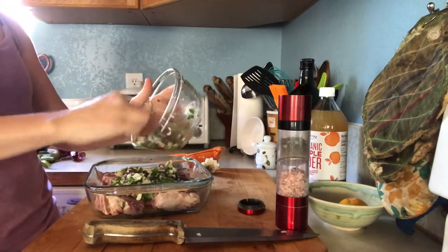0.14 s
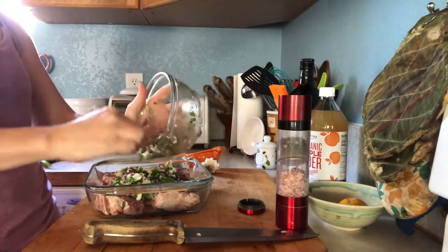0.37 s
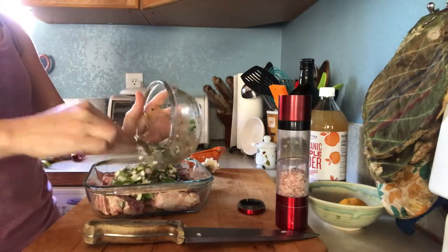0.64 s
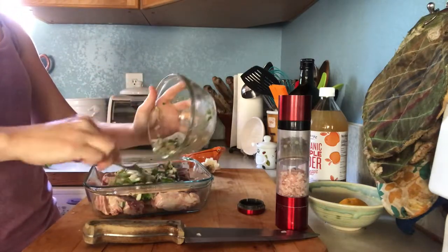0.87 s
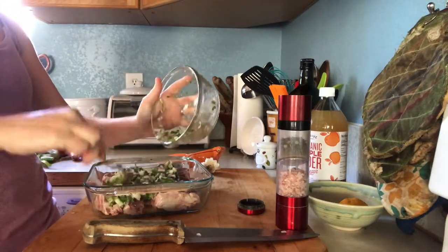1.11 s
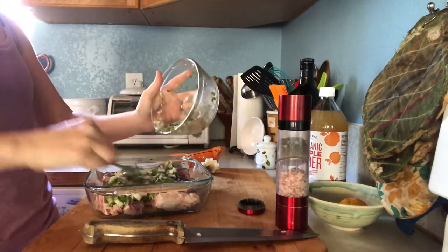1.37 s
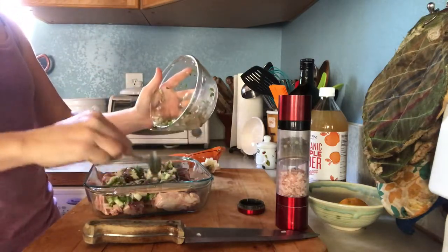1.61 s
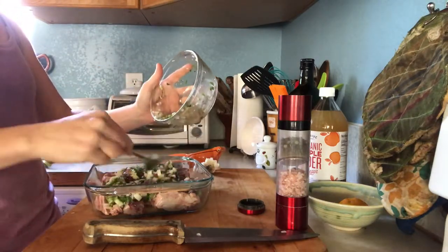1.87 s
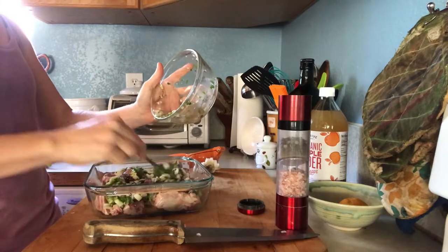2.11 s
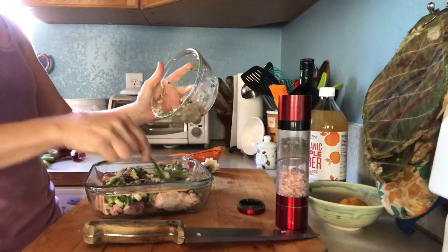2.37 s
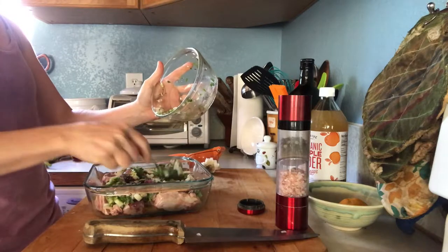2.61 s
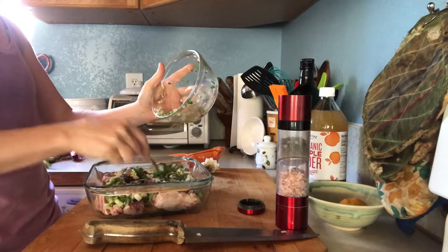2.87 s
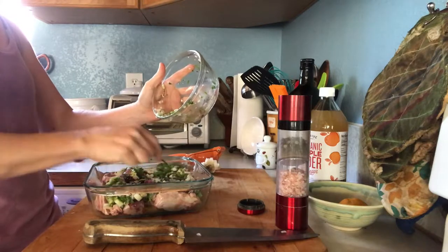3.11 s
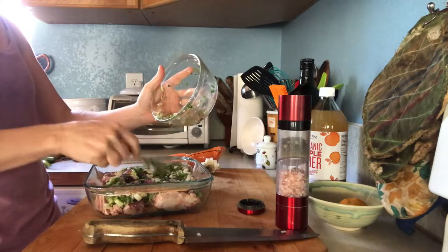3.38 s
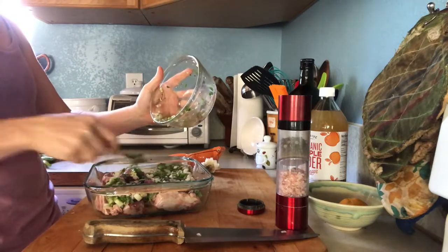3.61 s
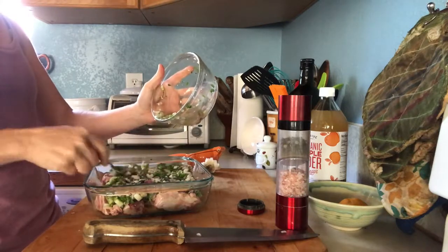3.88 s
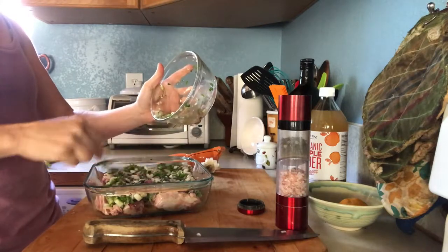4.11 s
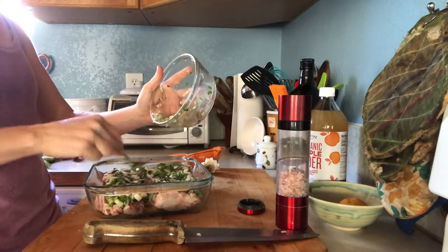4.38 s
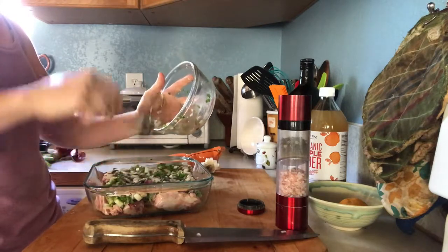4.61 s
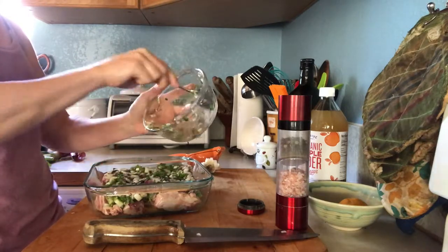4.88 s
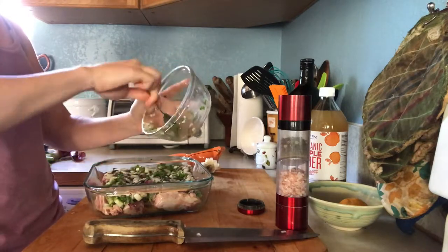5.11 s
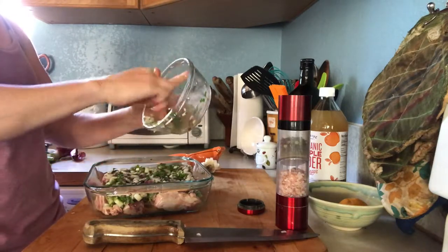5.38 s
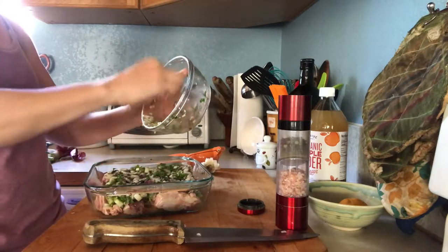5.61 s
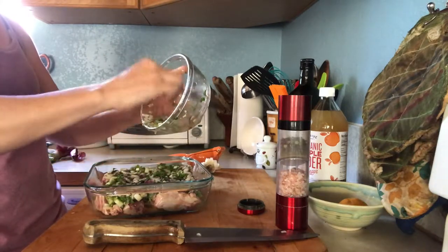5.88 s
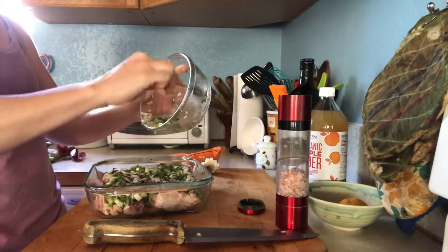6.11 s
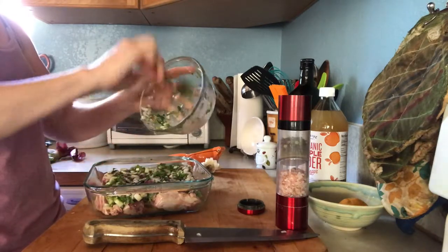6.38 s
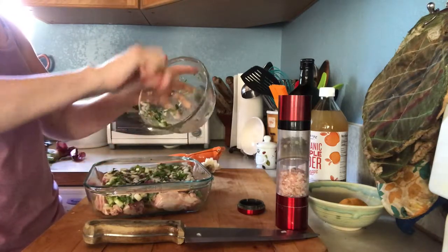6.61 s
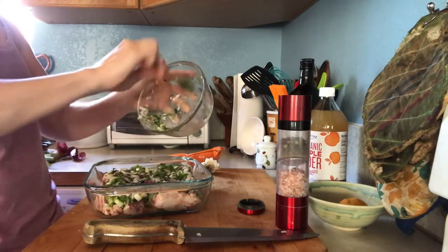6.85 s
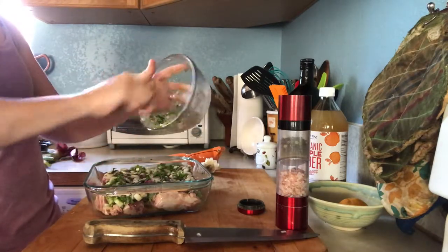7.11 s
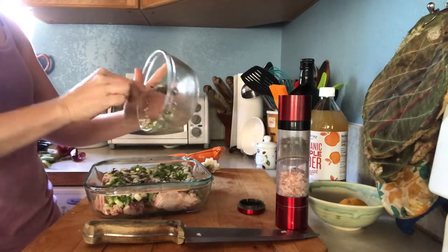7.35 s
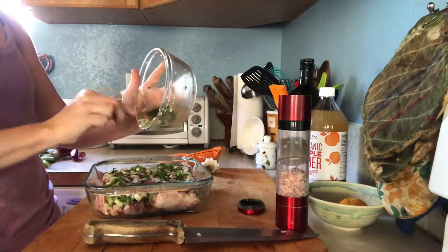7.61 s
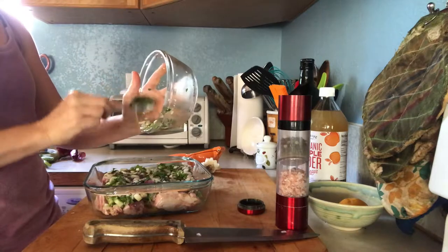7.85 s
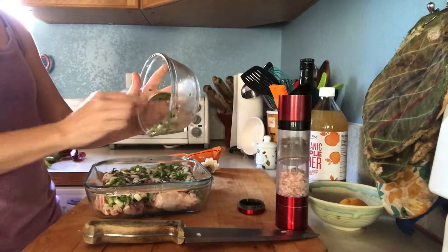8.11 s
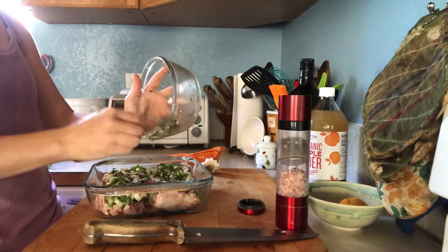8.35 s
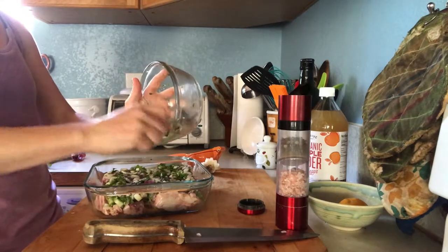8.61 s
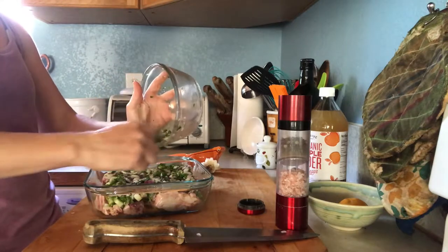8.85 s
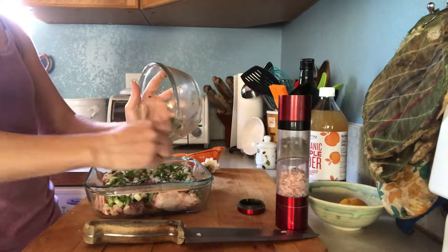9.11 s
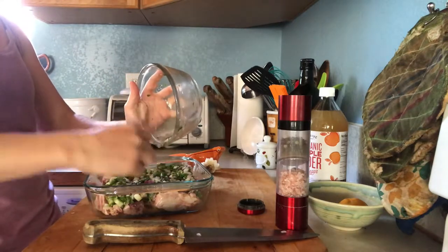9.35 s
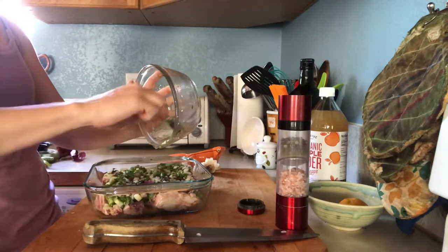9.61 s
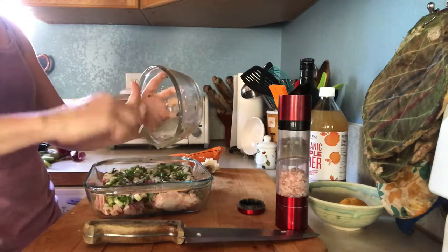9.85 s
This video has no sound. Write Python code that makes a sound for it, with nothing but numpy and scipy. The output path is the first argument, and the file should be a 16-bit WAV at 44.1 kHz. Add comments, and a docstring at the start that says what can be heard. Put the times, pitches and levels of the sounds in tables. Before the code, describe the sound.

Close-up kitchen sound with a low steady appliance hum. Sharp, hard spoon-on-glass clinks come first, choked at once by the holding hand. For several seconds only tiny wet pops and soft rustling strokes are heard, until a lower knock on a baking dish. After that, scattered loud and light taps, skids and short scrapes on the bowl, growing firmer and more regular at the end, where the glass squeaks once.

```python
"""A steel spoon taps and scrapes a small hand-held glass bowl, once knocks the baking dish below, and
spreads chopped herbs with faint wet crackles. Knocks are short decaying modes under a noisy crack, for the
hand damps the glass at once; scrapes are jerky noise through resonances, with one stick-slip squeal.
The kitchen carries the ring on as a noise echo; a fridge and a fan hum as wavering tones over air noise."""
import sys
import numpy as np
from scipy import signal
from scipy.fft import rfft, irfft
from scipy.io import wavfile
from scipy.ndimage import uniform_filter1d

SR = 44100
rng = np.random.default_rng(int(sys.argv[2]) if len(sys.argv) > 2 else 0)


def magnitude_from_level(level_db):
    """Linear magnitude for a level in decibels (20 dB per decade)."""
    exponent = np.asarray(level_db, float) / 20
    return 10 ** exponent


def to_wav(s):
    """Save 16-bit WAV."""
    ch = np.atleast_2d(s).T  # columns
    pcm = np.round(np.clip(ch, -1, 1) * 32767)  # PCM
    wavfile.write(sys.argv[1], SR, pcm.astype(np.int16))


N = 440118
DECAY = np.log(1000)  # exponent of a 60 dB fade

# spoon on bowl: (time [s], crack level [dB], low rim ring [dB], high rim ring [dB], base ring [dB])
TAPS = [(0.0787, -14, -32.5, -44, -34.5), (0.1027, -10.5, -85, -20, -29),
        (0.4071, -12.5, -24, -56.5, -45.5), (0.4352, -7, -29, -38.5, -37.5),
        (4.9192, -10.5, -26.5, -33, -56), (4.9904, -38, -46, -70, -74), (5.1354, -33.5, -38, -57.5, -73.5),
        (5.3606, -12.5, -81, -21, -20), (5.4535, -28.5, -44.5, -59, -47), (5.4973, -45, -45, -60, -64),
        (5.6735, -13, -81, -15.5, -18), (5.7563, -22.5, -61, -58, -51), (5.7898, -70, -70, -49, -53),
        (5.955, -14, -80, -25, -20.5), (6.2078, -12, -27.5, -60, -65), (6.2317, -22.5, -62, -37, -36),
        (6.2756, -24.5, -41, -72, -55), (6.3135, -28, -46, -46, -70), (6.541, -17.5, -32.5, -31, -33.5),
        (6.8187, -39.5, -47, -40, -85), (6.9813, -17, -32, -23.5, -49), (7.1174, -33, -62, -53.5, -54),
        (7.212, -40, -66, -49, -59), (7.4847, -21, -53.5, -28, -16.5), (7.5952, -29, -48, -52, -50),
        (7.8352, -14, -42, -20.5, -26.5), (8.268, -15, -78, -31.5, -12), (8.6298, -26.5, -29.5, -28.5, -38),
        (8.648, -14, -55, -28, -25), (8.6937, -17, -30, -68, -31), (8.973, -12.5, -32.5, -13, -68),
        (9.226, -11, -28, -25.5, -28), (9.3937, -17.5, -38, -12.5, -50), (9.6665, -10.5, -27.5, -15, -65),
        (9.817, -14, -56, -8.5, -49)]
# modes of the bending rim, the thick base and the spoon: (level [dB], t60 before damping limits [s])
RIM = [(-7, 0.074), (0, 0.05), (2.5, 0.079), (-12.5, 0.11), (4.5, 0.029), (-8.5, 0.043), (-3.5, 0.011),
       (-21.5, 0.025), (-10, 0.027), (-6.5, 0.047)]
BASE = [(-27, 0.012), (-7, 0.012), (-18.5, 0.054), (-23, 0.09), (-0.5, 0.026), (-6.5, 0.017), (-2.5, 0.02),
        (-13.5, 0.03), (-20, 0.03), (-13.5, .02)]
SPOON = [(-20.5, 0.021), (-17.5, .03), (-17.5, .03), (-7, .02), (-10.5, 0.018)]
# centre pitches of the same modes: (frequency [Hz])
RIM_HZ = [950, 2120, 2180, 3730, 3790, 5790, 5853, 8260, 11080, 14200]
BASE_HZ = [400, 800, 1800, 2660, 4660, 4715, 7620, 10150, 12120, 14720]
SPOON_HZ = [5190, 6450, 9520, 12550, 13550]


def unit(x):
    """Scale to rms 1."""
    return x / np.sqrt(np.mean(x ** 2))


def band(x, hz, width):
    """Two-pole resonance, gain 1 at the centre."""
    return signal.lfilter(*signal.iirpeak(min(hz, 0.4 * SR), hz / width, SR), x)


def twice(x, hz, width):
    """A steeper resonance: two equal ones in series."""
    return band(band(x, hz, width), hz, width)


def add(out, s, x):
    """Mix x in at time s."""
    i = int(s * SR)
    out[i:i + len(x)] += x[:N - i]


def walk(rate):
    """Random levels held 1 / rate seconds and slewed twice."""
    k = int(SR / rate)
    held = np.repeat(rng.standard_normal(N // k + 1), k)
    return uniform_filter1d(uniform_filter1d(held, k), k)[:N]


def curve(table, column, outside):
    """One column of a table over time."""
    rows = np.array(table)
    return np.interp(np.arange(N) / SR, rows[:, 0], rows[:, column], outside, outside)


def appliances():
    """Motor and fan tones that waver in level and pitch, over coloured air noise."""
    # motor and fan tones: (frequency [Hz], rms level [dB])
    hum = [(49.5, -70), (59.2, -63), (119.4, -67), (148, -76), (198.5, -67.5), (367, -80), (455, -92.5)]
    # air noise spectrum: (frequency [Hz], density [dB per Hz])
    air = [(28, -125), (45, -100), (90, -99), (170, -94), (330, -95), (600, -103), (1600, -105),
           (2000, -111), (2500, -110), (3200, -117), (6500, -118), (10500, -127), (13000, -124),
           (16000, -125)]
    waver_db, pitch_wander = 1.0, 0.002
    t = np.arange(N) / SR
    out = np.zeros(N)
    for hz, db in hum:
        gain = np.sqrt(2) * magnitude_from_level(db + waver_db * walk(hz / 20))
        cycles = hz * (t + pitch_wander * np.cumsum(walk(3.3)) / SR)
        out += gain * np.sin(2 * np.pi * (cycles + rng.random()))
    air_hz, air_db = np.transpose(air)
    hz = np.arange(N // 2 + 1) * SR / N + 1
    colour = magnitude_from_level(np.interp(np.log(hz), np.log(air_hz), air_db))
    noise = irfft(rfft(rng.standard_normal(N)) * colour, N) * np.sqrt(SR / 2)
    return out + noise * magnitude_from_level(1.0 * walk(0.71))


def kitchen(near):
    """Diffuse echo of a small hard room: bands of noise, each with its own fade."""
    # echo bands: (frequency [Hz], t60 [s], relative level [dB])
    bands = [(306, 0.99, 0), (700, 0.32, 1), (1240, 0.46, 6), (2470, 0.55, -1), (4670, 0.52, -1.5),
             (7140, 0.44, -0.5), (11200, 0.25, -0.5), (15100, 0.28, -2)]
    echo_db, rise_s = -10, 0.0013
    t = np.arange(int(0.7 * SR)) / SR
    tail = np.zeros(len(t))
    for hz, t60, db in bands:
        noise = twice(rng.standard_normal(len(t)), hz, 0.9 * hz)
        tail += magnitude_from_level(db) * noise * np.exp(-DECAY * t / t60)
    tail = tail * (1 - np.exp(-t / rise_s))
    tail = tail / np.sqrt(np.sum(tail ** 2))
    return magnitude_from_level(echo_db) * signal.fftconvolve(near, tail)[:N]


def herbs():
    """Wet crackles over a fine rustle that swells and fades with each stroke of the spoon."""
    # spreading strokes: (peak time [s], rustle level [dB])
    strokes = [(.02, -70), (0.819, -76.5), (1.049, -80), (1.19, -90.5), (1.491, -75.5), (1.76, -82.5),
               (2.04, -79.5), (2.33, -84), (2.56, -82.5), (2.679, -90.5), (2.79, -74), (2.941, -85),
               (3.1, -82.5), (3.52, -84.5), (3.85, -73), (4.09, -83.5), (4.289, -81.5)]
    # single pops at set times: (time [s], level [dB], centre [Hz])
    crackles = [(0.8994, -56.5, 9540), (0.9231, -56, 3520), (1.032, -53, 3500), (1.069, -58.5, 6500),
                (1.4511, -51, 4030), (1.472, -63, 6430), (1.5013, -52, 3550), (1.617, -65.5, 6370),
                (1.835, -57.5, 3860), (1.859, -58, 6760), (2.038, -58, 6950), (2.0945, -53, 3800),
                (2.119, -50.5, 6700), (2.283, -44, 3420), (2.3385, -52.5, 7030), (2.443, -71, 12000),
                (2.68, -55, 5800), (2.829, -49.5, 7030), (2.988, -66, 14000), (3.087, -55, 5500),
                (3.3338, -42.5, 3930), (3.5246, -50.5, 3500), (3.6004, -57, 9040), (3.8582, -54, 4220),
                (3.92, -68, 12000), (4.071, -48, 5400), (4.3, -56, 5560), (4.508, -58, 13600)]
    rise_db_s, fall_db_s = 154.5, 123.5
    # more pops scattered round each stroke: level over its rustle, spread in time, middle pitch
    pop_db, pop_spread_s, pop_hz = 14, 0.05, 5500
    pop_width, snap_db = 0.6, -10  # width of a pop's colour over its pitch; broad snap under it

    rustle = rng.standard_normal(N) * magnitude_from_level(4 * walk(40) + 5 * walk(500))
    s, db = np.transpose(strokes)[:, :, None]
    since = np.arange(0, N, 64) / SR - s  # the swell moves in 64-sample steps
    swell = magnitude_from_level(db + np.minimum(rise_db_s * since, -fall_db_s * since)).sum(axis=0)
    out = unit(band(rustle, 4500, 10000)) * np.repeat(swell, 64)[:N]

    late, loud, high = rng.standard_normal((3, len(strokes), 5))  # five pops a stroke
    pop_s = abs(s + pop_spread_s * late)
    pops = np.stack([pop_s, db + pop_db + 3 * loud, pop_hz * 1.5 ** high], axis=2)
    t = np.arange(SR // 40) / SR
    for s, db, hz in list(crackles) + list(pops.reshape(-1, 3)):
        burst = rng.standard_normal(len(t)) * np.exp(-DECAY * t / 0.018)
        pop = twice(burst, hz, pop_width * hz) * np.sqrt(7000 / hz)
        snap = magnitude_from_level(snap_db) * band(burst, 8000, 14000)
        add(out, s, magnitude_from_level(db) * (pop + snap))
    return out


def squeal():
    """Stick-slip of the spoon's edge near a rim mode: alternate slips give the half tone; the grip flutters."""
    # swell of the squeal: (time [s], level [dB])
    swell = [(9.69, -61), (9.71, -46), (9.735, -33), (9.755, -37), (9.778, -24.5), (9.8, -33.5),
             (9.812, -46)]
    # partials: (multiple of the pitch, level [dB])
    orders = [(.5, -4), (1, 0), (1.5, -9), (2, -20), (3, -33), (3.5, -30)]
    pitch = 4090 * (1 + 0.026 * walk(1500))  # Hz
    phase = 2 * np.pi * np.cumsum(pitch) / SR
    grip_db = 2.5 * walk(220)
    tones = np.zeros(N)
    for k, db in orders:
        tones += magnitude_from_level(db + grip_db + 2.5 * walk(300)) * np.sin(k * phase)
    return tones * magnitude_from_level(curve(swell, 1, -120))


def drags():
    """The edge catches and slips in uneven jerks that sound the contact resonance and keep the glass singing."""
    # spoon dragged on the glass: (middle [s], nominal length [s], level [dB], contact pitch [Hz])
    strokes = [(0.181, 0.036, -54.5, 6570), (8.04, .05, -74, 4120), (8.05, .05, -74.5, 6020),
               (9.27, .08, -49, 2640), (5.01, 0.077, -64, 7200), (5.085, 0.11, -54.5, 3980),
               (5.139, 0.054, -63, 7000), (5.155, .06, -58, 1980), (5.195, 0.013, -58.5, 2520),
               (5.43, 0.11, -64.5, 3420), (5.8, .05, -56.5, 2450), (6.03, 0.082, -59.5, 6160),
               (7.08, 0.076, -61, 4090), (7.58, 0.062, -60.5, 1900), (7.632, .08, -62, 2640),
               (8.02, 0.16, -68, 2250), (8.034, 0.093, -65.5, 1250), (8.33, 0.026, -54.5, 3200),
               (8.37, 0.03, -50, 2330), (8.616, 0.028, -71, 900), (8.84, 0.026, -73, 2730),
               (8.92, 0.097, -69.5, 3400), (9.3, 0.14, -62.5, 5060), (9.36, 0.13, -52.5, 4060)]
    contact_width = 0.11  # of the contact resonance, over its pitch
    glass_db, hiss_db = -8, -14
    contact, push = np.zeros(N), np.zeros(N)
    for s, length, db, hz in strokes:
        samples = min(int(length * 1.6 * SR), SR // 4)  # the fades at both ends stretch the stroke
        noise, uneven = rng.standard_normal((2, samples))
        slow_jerks = unit(uniform_filter1d(uneven, SR // 250))
        fast_jerks = unit(uniform_filter1d(uneven[::-1], SR // 1500))
        grit = noise * magnitude_from_level(5 * (slow_jerks + fast_jerks) + db) * np.hanning(samples)
        start = s - samples / SR / 2
        padded = np.pad(grit, (0, SR // 50))  # room for the resonance to fade
        scrape = twice(padded, hz, contact_width * hz)
        add(contact, start, scrape * np.sqrt(SR / contact_width / hz))
        add(push, start, grit)
    modes = zip(RIM_HZ + BASE_HZ, RIM + BASE)
    glass = sum(magnitude_from_level(db) * band(push, hz, 20) for hz, (db, _) in modes)
    hiss = band(push, 5000, 9000)
    return contact + magnitude_from_level(glass_db) * np.sqrt(SR / 400) * glass + magnitude_from_level(hiss_db) * hiss


def skids():
    """After each tap the spoon skids on: fading grit sounds the bowl's modes, blurred by the contact."""
    skid_db, skid_t60_s = -41, 0.22  # level against the tap's crack; fade
    mode_width, hiss_db = 0.023, -8.5  # blur of the modes over their pitch; bare hiss
    push, t = np.zeros(N), np.arange(SR // 2) / SR
    for s, db, *_ in TAPS:
        add(push, s, magnitude_from_level(db + skid_db) * np.exp(-DECAY * t / skid_t60_s))
    grit = push * rng.standard_normal(N) * magnitude_from_level(4 * walk(120) + 4 * walk(900))
    modes = zip(RIM_HZ + BASE_HZ + SPOON_HZ, RIM + BASE + SPOON)
    glass = sum(magnitude_from_level(db) * twice(grit, hz, mode_width * hz) for hz, (db, _) in modes)
    hiss = magnitude_from_level(hiss_db) * band(grit, 2700, 7000)
    return np.sqrt(SR / 400) * (glass + hiss)


def ring(hz, modes, db):
    """Decaying modes; strengths, phases and pitches vary a little at random from blow to blow."""
    rise_s = 0.00068
    mode_db, t60 = np.transpose(modes)[:, :, None]
    hz = np.array(hz)[:, None]
    strength, detune, turn = rng.standard_normal((3, len(modes), 1))
    t = np.arange(SR // 5) / SR
    t60 = np.clip(t60, 0.01, np.minimum(0.11, 400 / hz))  # the hand stops long rings, the treble first
    spread_db = 1 + hz / 6000  # strengths of the high modes vary most
    gain = magnitude_from_level(mode_db + db + spread_db * strength) * np.exp(-DECAY * t / t60)
    pitch = hz * (1 + 0.003 * detune)
    tones = gain * np.sin(2 * np.pi * pitch * t + 3 * turn)
    return (1 - np.exp(-t / rise_s)) * np.sum(tones, axis=0)


def crack(db, treble_db):
    """The contact and the crowd of modes too short to tell apart: noise with a quicker treble fade."""
    body_t60, treble_t60, fizz_db = 0.028, 0.01, 6
    t = np.arange(SR // 5) / SR
    body, top = rng.standard_normal((2, len(t))) * (1 - np.exp(-t / 0.0018))
    body = twice(body, 3600, 5500) * np.exp(-DECAY * t / body_t60)
    top = twice(top, 12000, 11000) * np.exp(-DECAY * t / treble_t60)
    return body * magnitude_from_level(db) + top * magnitude_from_level(treble_db + fizz_db)


def dish():
    """One knock on the heavier dish, which has lower modes than the bowl."""
    # the knock: (time [s], level [dB], treble crack level [dB])
    knock = (4.3226, -10, -24)
    # modes of the dish: (level [dB], t60 before damping limits [s])
    modes = [(-31, 0.027), (-25.5, 0.042), (-9.5, 0.039), (-10.5, 0.028), (-19, 0.03), (-10, 0.028),
             (-25, 0.022), (-10.5, 0.047), (-8.5, 0.022), (-9.5, 0.057), (-16, 0.027), (-11.5, 0.022),
             (-31.5, 0.05), (-20, .025)]
    # their centre pitches: (frequency [Hz])
    modes_hz = [150, 300, 1100, 1850, 2525, 2858, 3100, 3400, 3790, 3930, 5324, 6551, 11150, 14150]
    out = np.zeros(N)
    s, db, treble_db = knock
    add(out, s, ring(modes_hz, modes, db) + crack(db, treble_db))
    return out


def share(modes_hz, hz, db):
    """Spread a blow's strengths over the modes by pitch."""
    return np.interp(np.log(modes_hz), np.log(hz), db)[:, None]


def bowl():
    """Each tap rings rim, base and spoon in its own shares; a hard contact drives the top modes most."""
    # treble of a firm tap under its crack; softer taps lose it faster, a stronger base ring adds some
    firm_db, under_db = -12.5, -6
    treble_slope, base_slope = 1.3, 0.12  # dB per dB
    out = np.zeros(N)
    for s, db, low_db, high_db, base_db in TAPS:
        treble_db = firm_db + under_db + treble_slope * (db - firm_db) + base_slope * (base_db - db)
        rim_db = share(RIM_HZ, [2150, 5800, 11000], [low_db, high_db, treble_db])
        middle_db = (base_db + high_db) / 2
        thick_db = share(BASE_HZ, [4800, 7600, 10000], [base_db, middle_db, treble_db])
        spoon_db = share(SPOON_HZ, [6500, 9500], [db, treble_db])
        glass = ring(RIM_HZ, RIM, rim_db) + ring(BASE_HZ, BASE, thick_db)
        add(out, s, glass + ring(SPOON_HZ, SPOON, spoon_db) + crack(db, treble_db))
    return out


def scene():
    """Near sounds, their echo and the hum."""
    near = herbs() + squeal() + drags() + skids() + dish() + bowl()
    return (near + kitchen(near) + appliances())[None]


def low_pass(x):
    """Removes everything above the highest recorded frequency."""
    return signal.sosfilt(signal.butter(12, 16810, fs=SR, output="sos"), x)


def record(dry):
    """The microphone rounds the loudest peaks."""
    mix = np.tanh(1.638 * dry) / 1.46
    return low_pass(mix)


dry = scene()
out = record(dry)
to_wav(out)
```